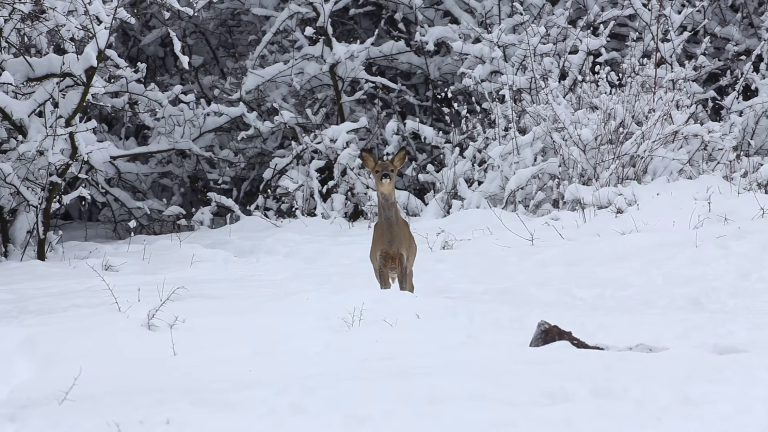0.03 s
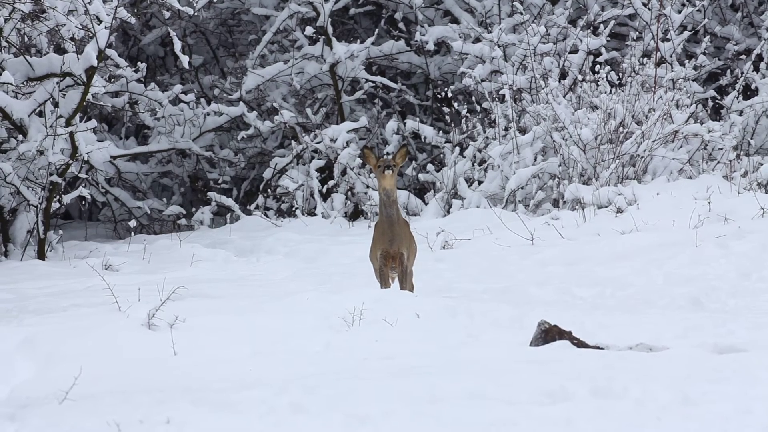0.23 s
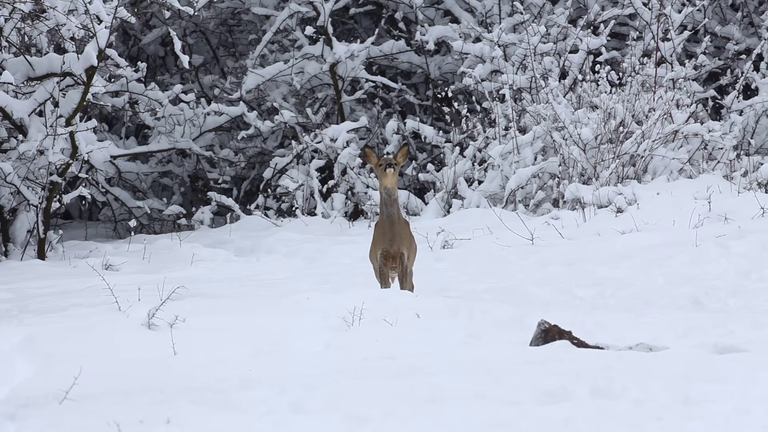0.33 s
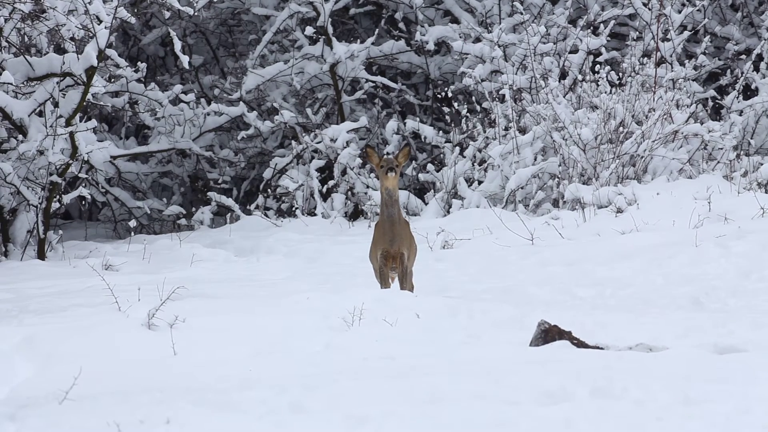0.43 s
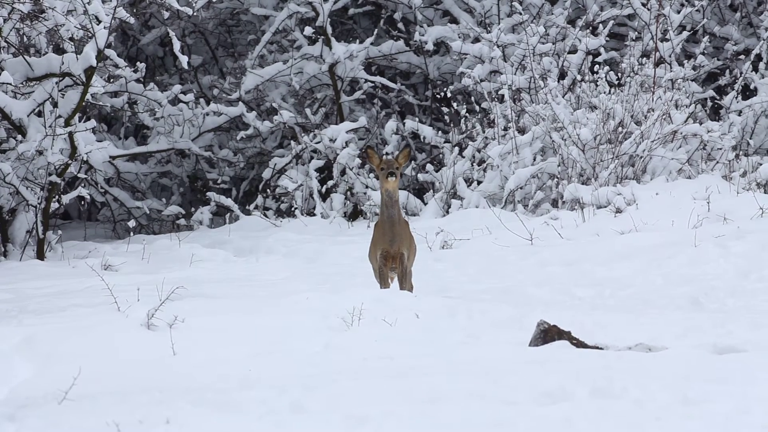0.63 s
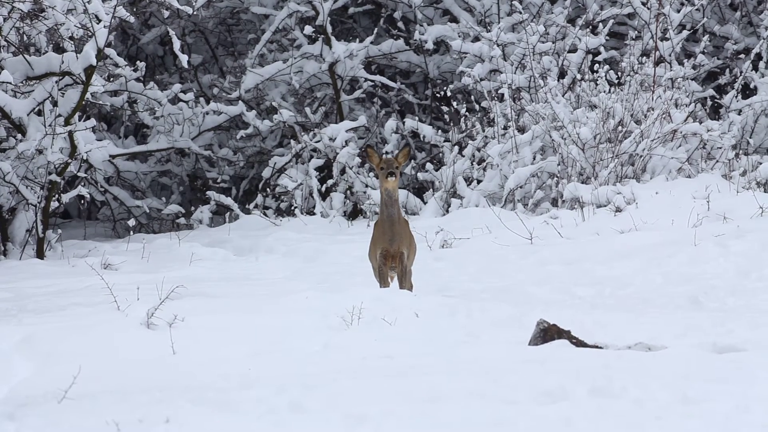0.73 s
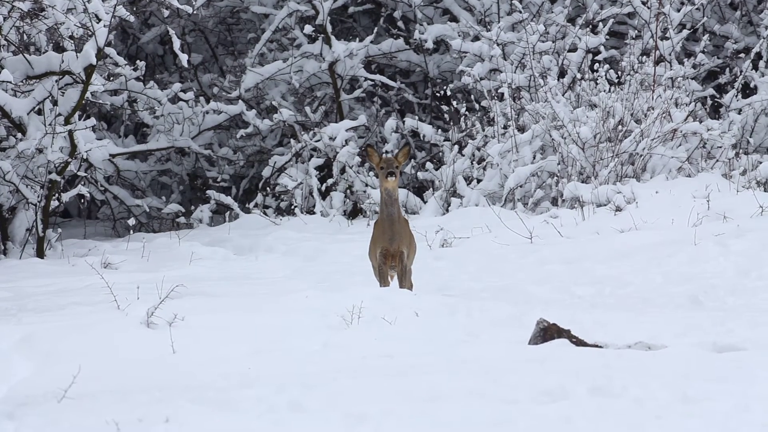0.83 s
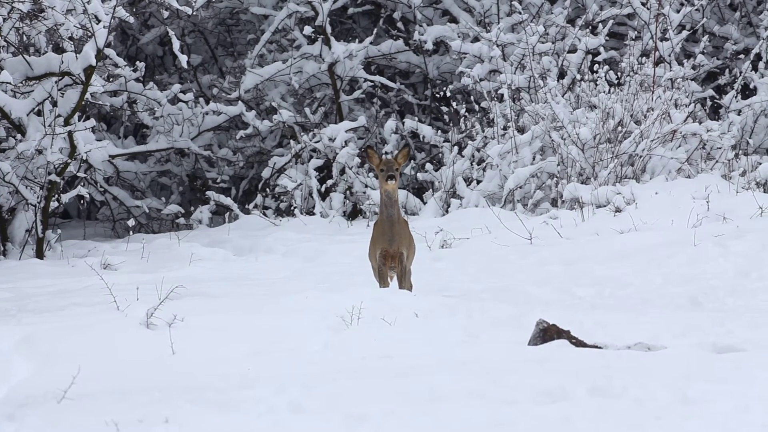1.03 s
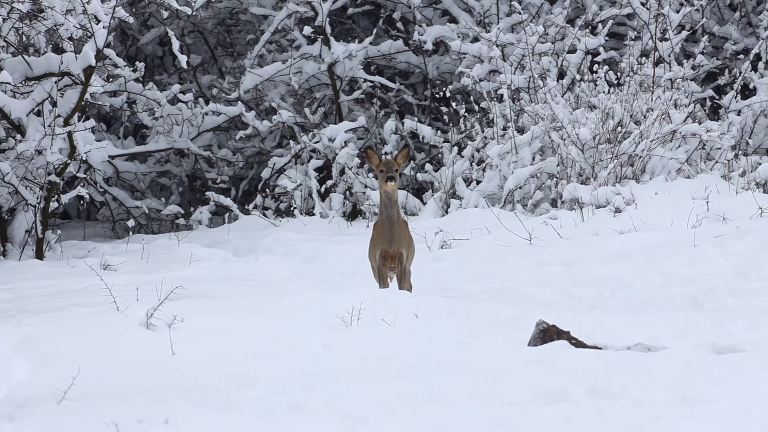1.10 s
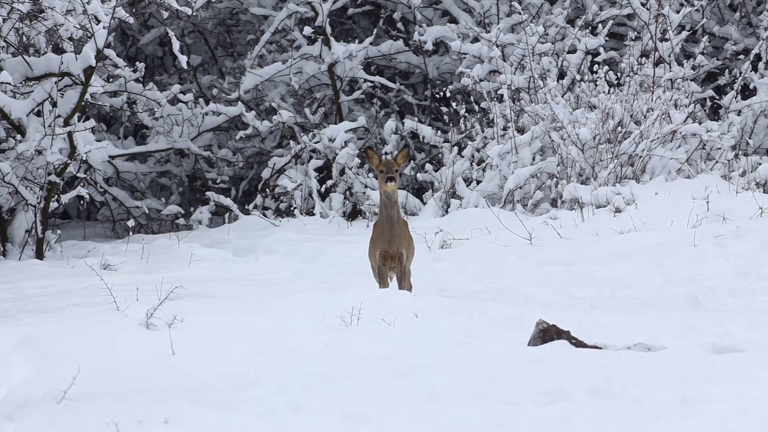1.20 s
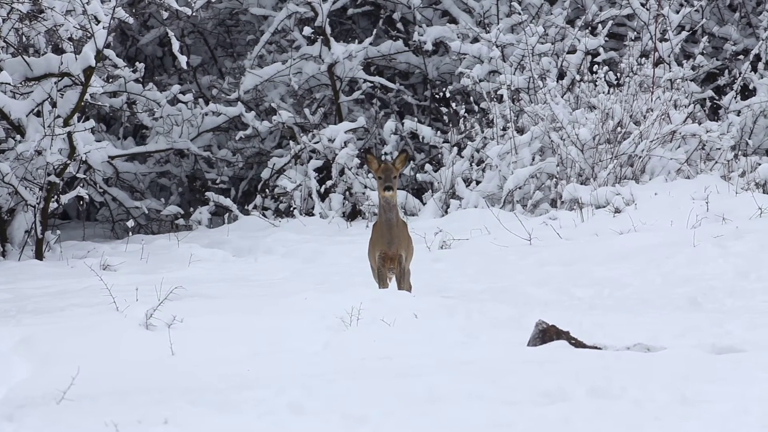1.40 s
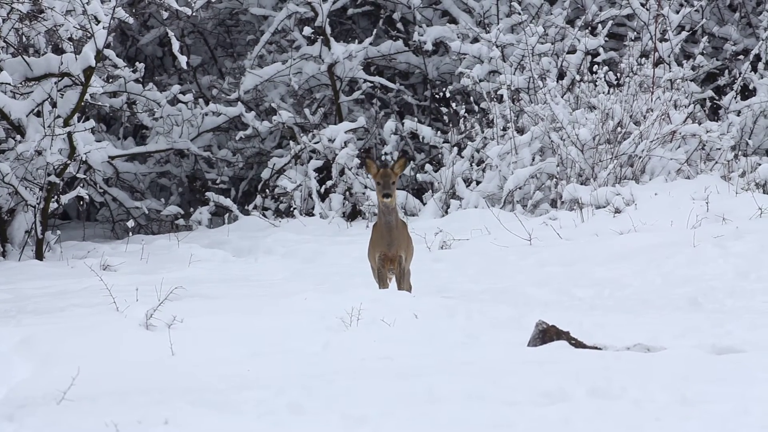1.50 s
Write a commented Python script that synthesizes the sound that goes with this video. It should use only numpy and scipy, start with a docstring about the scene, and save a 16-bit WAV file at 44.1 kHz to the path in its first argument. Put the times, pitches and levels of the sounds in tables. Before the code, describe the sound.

One raspy deer bark in snowy woods, over soft hiss and faint chirping birds.

```python
"""Deer bark in a snowy clearing

One harsh, unvoiced bark: a smack, then air forced through throat and muzzle in two surges
and a long fading push that is cut off. Faint birds chirp and tick around it, over steady hiss
and a low, uneven rumble. Trees add a short scatter. Both channels carry the same sound."""
import sys
import numpy as np
from scipy import signal
from scipy.fft import rfft, irfft
from scipy.io import wavfile

SR = 44100
rng = np.random.default_rng(int(sys.argv[2]) if len(sys.argv) > 2 else 0)


def store_wav(level_fs):
    """Save 16-bit WAV to argv[1]."""
    pcm = np.round(np.clip(np.atleast_2d(level_fs), -1, 1) * 32767)
    wavfile.write(sys.argv[1], SR, pcm.T.astype(np.int16))


N = 68355
T = np.arange(N) / SR


def amp(db):
    """Decibels to gain."""
    return 10 ** (np.asarray(db) / 20)


def unit(x):
    """Scale to rms 1."""
    return x / np.sqrt(np.mean(x ** 2) + 1e-20)


def curve(points):
    """Straight lines through (s, value) points."""
    return np.interp(T, *np.transpose(points))


def swell(points):
    """Gain from (s, dB) points, silent outside them."""
    return amp(curve(points)) * (T >= points[0][0]) * (T <= points[-1][0])


def coloured(gain):
    """Noise of rms 1 with spectrum gain(Hz)."""
    spectrum = rfft(rng.standard_normal(N))
    return unit(irfft(spectrum * gain(np.fft.rfftfreq(N, 1 / SR)), N))


def shaped(points):
    """Noise of rms 1 with a spectrum through (Hz, dB) points."""
    hz, db = np.transpose(points)
    return coloured(lambda f: amp(np.interp(np.log(f + 1), np.log(hz + 1), db)))


def band(hz, width_hz):
    """Noise in one steep-sided resonance."""
    return coloured(lambda f: 1 / np.sqrt(1 + (2 * (f - hz) / width_hz) ** 4))


def wander(rate_hz):
    """Smooth random motion up to about rate_hz."""
    return coloured(lambda f: np.exp(-(f / rate_hz) ** 2))


def shifted(x, hz):
    """Frequency shift by a curve in Hz."""
    return (signal.hilbert(x) * np.exp(2j * np.pi * np.cumsum(hz) / SR)).real


def background():
    """Steady hiss, soft low-mid wash, uneven rumble and faint whines."""
    # Each row: frequency in Hz, relative density in dB.
    hiss_spectrum = [(15, -37), (25, -15), (42, 4), (70, 3.5), (120, 0), (200, -0.5), (320, -5), (700, -7),
                     (1200, -6.5), (2500, -7.5), (4200, -9), (6800, -9.5), (9000, -13.5), (12500, -18.5),
                     (15700, -20)]
    # Each row of both: time in seconds, level in dB.
    wash_levels = [(0, -65), (0.25, -63.5), (0.45, -71), (1.2, -67.5), (1.55, -90)]
    rumble_levels = [(0, -75), (0.13, -64.5), (0.3, -65.5), (0.43, -53), (0.49, -71), (0.72, -61),
                     (0.95, -68.5), (1.2, -63.5), (1.5, -75)]
    # Each row: frequency in Hz, level in dB.
    whine_tones = [(2929, -74.5), (6837, -85), (8791, -87), (11719, -84)]
    hiss = amp(-58) * shaped(hiss_spectrum)
    wash = amp(curve(wash_levels)) * band(hz=432, width_hz=1220)
    rumble = amp(curve(rumble_levels)) * band(hz=117, width_hz=21.3)
    whines = sum(np.sqrt(2) * amp(db) * np.sin(2 * np.pi * (hz * T + rng.random()))
                 for hz, db in whine_tones)
    return hiss + wash + rumble + whines


def woods(x, level_db=-12.5, t60_s=0.12):
    """Weak, short scatter from the snowy trees."""
    tail = rng.standard_normal(N) * np.exp(-np.log(1000) * T / t60_s)
    return amp(level_db) * signal.fftconvolve(x, tail / np.linalg.norm(tail))[:N]


def ticks():
    """Very short noise bursts, each in one band."""
    # Each row: peak time in seconds, length in seconds, centre in Hz, width in Hz, level in dB.
    bursts = [(0.210, 0.0057, 4660, 900, -57), (0.417, 0.0075, 8900, 2200, -56.5),
              (0.6635, 0.004, 7560, 1400, -54), (0.6865, 0.0028, 7800, 2500, -54.5),
              (0.7005, 0.0034, 3500, 700, -46.5), (1.165, 0.0033, 736, 796, -51.5),
              (1.181, 0.014, 566, 200, -58), (1.325, 0.0056, 1650, 800, -56)]
    return sum(amp(db) * np.exp(-(2 * (T - peak_s) / length_s) ** 2) * band(hz, width_hz)
               for peak_s, length_s, hz, width_hz, db in bursts)


def snap(start_s=1.0314, hz=7950, decay_s=0.00014, level_db=-27):
    """Bright click that dies within a few cycles."""
    t = np.maximum(T - start_s, 0)
    return amp(level_db) * np.exp(-t / decay_s) * np.sin(2 * np.pi * hz * t)


def bird_note(start_s, length_s, hz, level_db, roughness, flutter_hz=500):
    """Whistle on a pitch curve; roughness sets the flutter in pitch and level."""
    progress = np.clip((T - start_s) / length_s, 0, 1)
    pitch_hz = hz * (1 + 0.09 * roughness * wander(flutter_hz))
    envelope = amp(level_db) * abs(np.sin(np.pi * progress)) ** 0.54
    flutter = 1 + 0.5 * roughness * wander(flutter_hz)
    return np.sqrt(2) * envelope * flutter * np.sin(2 * np.pi * np.cumsum(pitch_hz) / SR)


def twitter(start_s=0.559, length_s=0.053):
    """High bird note that warbles as it sinks."""
    centre_hz, sag_hz_per_s, warble_hz, depth_hz = 7580, 8000, 55, 260
    t = np.clip(T - start_s, 0, length_s)
    hz = centre_hz - sag_hz_per_s * t + depth_hz * np.cos(2 * np.pi * warble_hz * t)
    return bird_note(start_s, length_s, hz, level_db=-56.5, roughness=0.23)


def chirps():
    """Bird notes, each gliding through three pitches."""
    # Each row: start and length in seconds, first, middle and last pitch in Hz,
    # level in dB, roughness from 0 to 1.
    notes = [(0.395, 0.015, 4360, 4180, 3680, -55, 0.37), (0.41, 0.026, 3150, 3700, 4160, -62, 0.26),
             (0.488, 0.0083, 4200, 3500, 2240, -48.5, 0.07), (0.497, .016, 3750, 2570, 3100, -56.5, 0.14),
             (0.509, 0.036, 1995, 2810, 3150, -58, 0.38), (0.528, 0.0368, 3150, 3680, 3467, -53.5, 0.14),
             (0.56, 0.043, 3620, 3440, 3380, -52.5, 0.3), (0.568, 0.034, 3090, 3110, 2500, -56.5, 0.68),
             (0.515, 0.022, 6840, 7000, 7360, -59, .15), (0.568, 0.027, 6200, 6150, 6200, -61, 0.8),
             (0.611, .024, 6300, 5900, 5360, -62, 0.5), (0.703, 0.028, 6700, 5140, 5050, -56, 0.28),
             (0.8143, 0.0097, 5050, 7210, 7200, -41, 0.37), (0.984, 0.015, 4920, 7200, 7400, -44, 0.33),
             (1.352, 0.045, 3150, 3180, 2750, -63, 0.14), (1.443, 0.042, 1930, 2670, 4430, -60.5, 0.21)]
    sound = np.zeros(N)
    for start_s, length_s, *pitches_hz, level_db, roughness in notes:
        hz = np.interp((T - start_s) / length_s, [0, 0.5, 1], pitches_hz)
        sound += bird_note(start_s, length_s, hz, level_db, roughness)
    return sound


def rasp(depth_db=1.0, rate_hz=350):
    """Fast random gain that roughens the airflow."""
    return unit(amp(depth_db * wander(rate_hz)))


def lead_in():
    """Weak, diffuse rasp of air just ahead of the bark."""
    # Each row: time in seconds, level in dB.
    flow = [(0.608, -61), (0.622, -58.5), (0.645, -57.5), (0.665, -63.5), (0.70, -52.5), (0.718, -52.5),
            (0.735, -60), (0.752, -70)]
    # Each row: frequency in Hz, relative density in dB.
    spectrum = [(700, -15), (1400, -9.5), (2400, 2), (3000, -7.5), (4500, -11), (6200, -13.5), (10000, -33)]
    return swell(flow) * shaped(spectrum) * rasp()


def smack(peak_s=0.7023, level_db=-29.5):
    """Pop whose ring drops an octave into its peak and swings back up."""
    low_hz, sweep_hz_per_s, rise_s, decay_s = 1920, 190000, 0.0014, 0.001
    t = T - peak_s
    hz = low_hz + np.minimum(sweep_hz_per_s * abs(t), low_hz)
    envelope = np.exp(-abs(t) / np.where(t < 0, rise_s, decay_s))
    return amp(level_db) * envelope * np.sin(2 * np.pi * np.cumsum(hz) / SR)


def air_whistle(start_s=1.022, length_s=0.12, level_db=-58.5):
    """Thin whistle of air in the bark's fading push."""
    progress = np.clip((T - start_s) / length_s, 0, 1)
    return amp(level_db) * np.sin(np.pi * np.sqrt(progress)) * band(hz=6000, width_hz=760)


def bark():
    """Rasping air excites wavering resonances, whose balance shifts as the mouth narrows."""
    # Force of the air. Each row: time in seconds, level in dB.
    effort = [(0.740, -56), (0.753, -46.5), (0.772, -42.5), (0.795, -39), (0.812, -44.5), (0.835, -46),
              (0.857, -40.5), (0.897, -40), (0.915, -43.5), (0.95, -47.5), (0.975, -49), (1.07, -48),
              (1.12, -50.5), (1.16, -51.5), (1.182, -47.5), (1.204, -48), (1.211, -72)]
    # Mouth. Each row: time in seconds, opening from 0 (narrow) to 1 (wide).
    mouth = [(0.75, 1), (0.80, 1.0), (0.90, 0.71), (0.95, 0.75), (0.985, .2), (1.10, 0.041), (1.18, 0.24)]
    # Throat and muzzle. Each row: centre and width in Hz, relative dB when wide and when narrow.
    resonances = [(970, 240, -14.5, -27), (1380, 240, -12.5, -18.5), (1674, 76, -9, -10.5),
                  (1940, 240, -9.5, -8), (2130, 110, -4, -8.5), (2290, 173, -3.5, -1), (2970, 280, -10, -9),
                  (3400, 270, -7.5, -41), (3800, 270, -7.5, -12), (4217, 280, -7, -7),
                  (5720, 420, -14.5, -17)]
    # Upper resonances against lower. Each row: time in seconds, gain in dB.
    treble = [(0.75, 0.5), (0.775, 2), (0.80, -0.5), (0.83, 2.5), (0.895, -2.5), (0.95, 5.5), (0.98, 1.5),
              (1.2, -0.5)]
    # Broad rush between the resonances. Each row: frequency in Hz, relative density in dB.
    rush_spectrum = [(300, -48), (800, -17.5), (1600, -0.5), (2700, 2.5), (4300, -3), (4700, 0.5),
                     (6500, -13.5), (9000, -12), (15000, -48)]
    split_hz, narrow_rise_hz, waver_depth_hz = 2600, 70.17, 11.7
    opening = np.clip(curve(mouth), 0, 1)
    rings = [(hz, amp(narrow_db + (wide_db - narrow_db) * opening) * band(hz, width_hz))
             for hz, width_hz, wide_db, narrow_db in resonances]
    lower = sum(ring for hz, ring in rings if hz <= split_hz)
    upper = sum(ring for hz, ring in rings if hz > split_hz)
    upper = amp(curve(treble)) * shifted(upper, narrow_rise_hz * (0.5 - opening))
    throat = shifted(lower + upper, waver_depth_hz * wander(rate_hz=29))
    rush = amp(-6) * shaped(rush_spectrum)
    return unit(throat + rush) * rasp() * swell(effort)


def scene():
    """Deer and birds in the clearing, centred."""
    birds = twitter() + chirps()
    deer = lead_in() + bark() + air_whistle() + smack()
    calls = deer + birds + snap() + ticks()
    mono = calls + woods(calls) + background()
    return np.array([mono, mono])


def record(dry):
    """Steep low-pass."""
    cutoff_hz = 15800
    taps = signal.firwin(511, cutoff_hz, window=("kaiser", 9), fs=SR)
    return signal.oaconvolve(dry, taps[None], "same")


dry = scene()
out = record(dry)
store_wav(out)
```